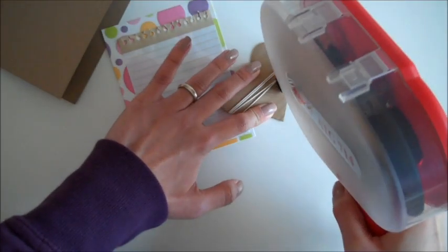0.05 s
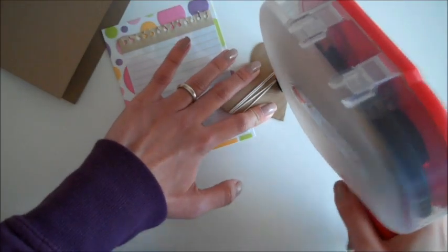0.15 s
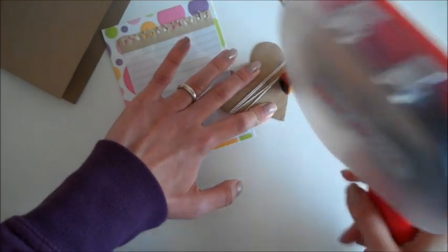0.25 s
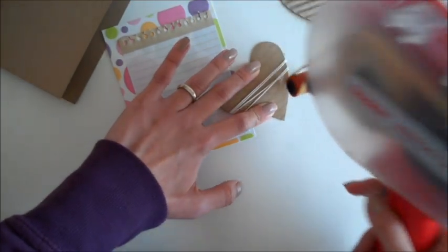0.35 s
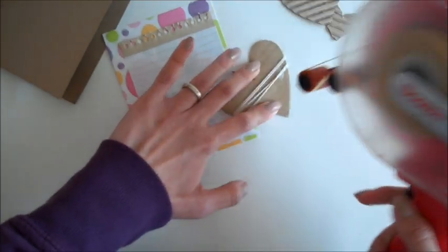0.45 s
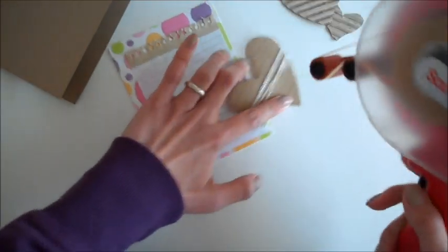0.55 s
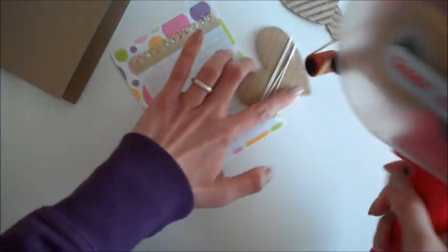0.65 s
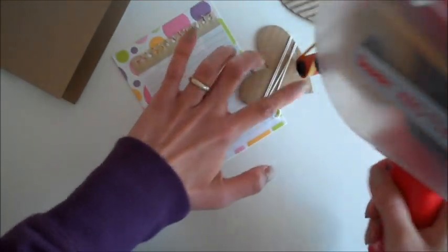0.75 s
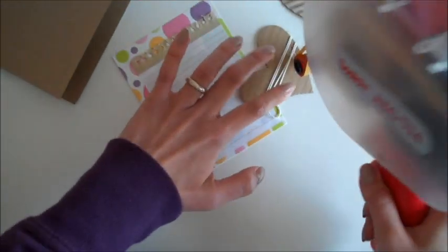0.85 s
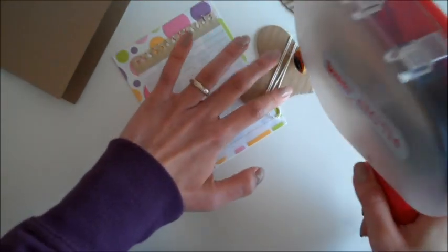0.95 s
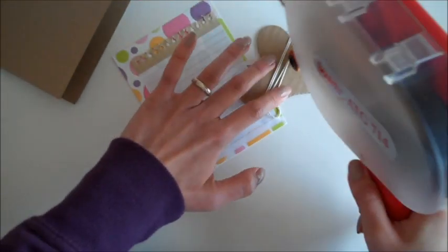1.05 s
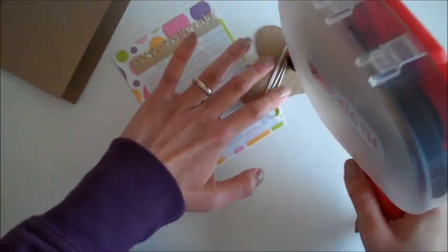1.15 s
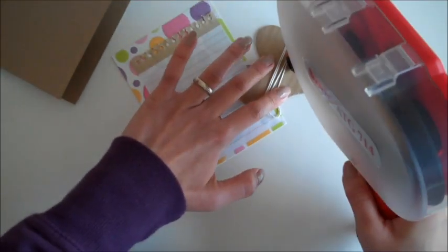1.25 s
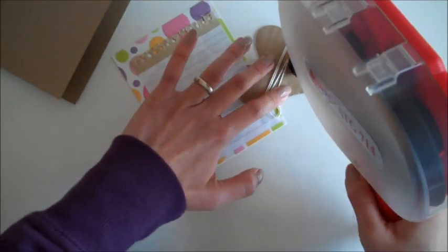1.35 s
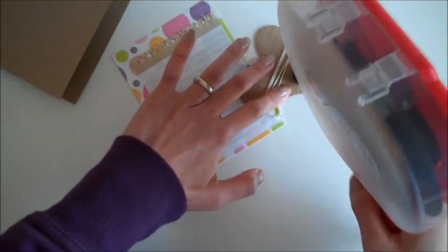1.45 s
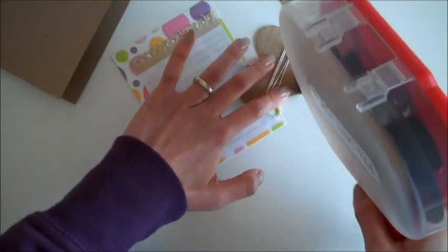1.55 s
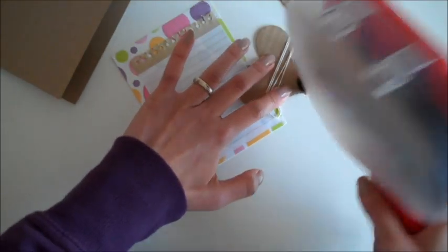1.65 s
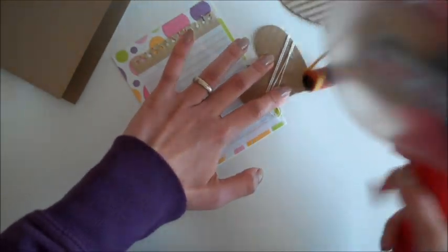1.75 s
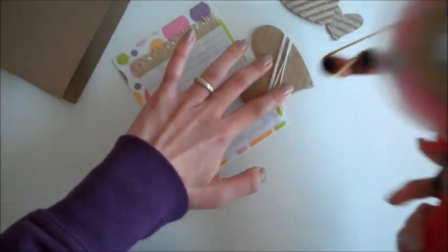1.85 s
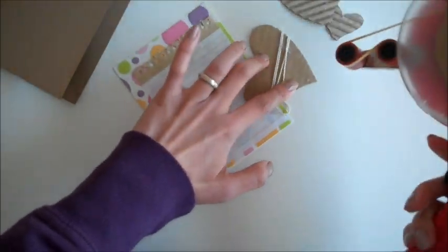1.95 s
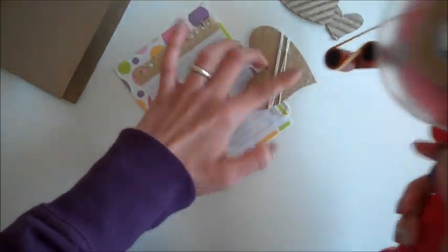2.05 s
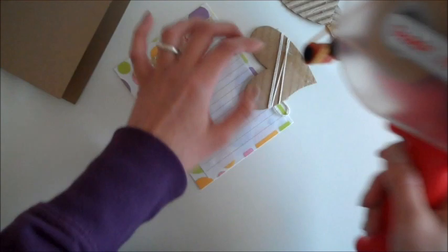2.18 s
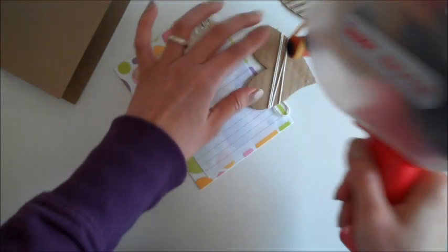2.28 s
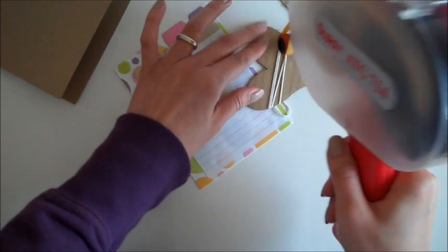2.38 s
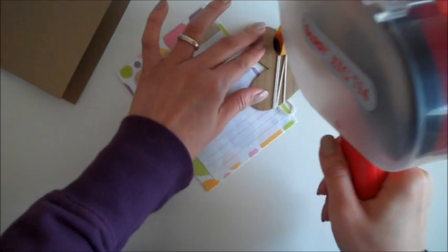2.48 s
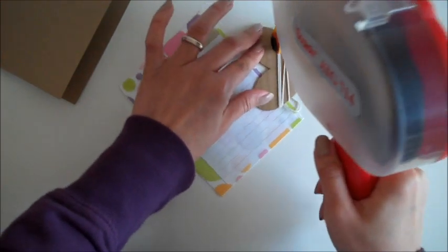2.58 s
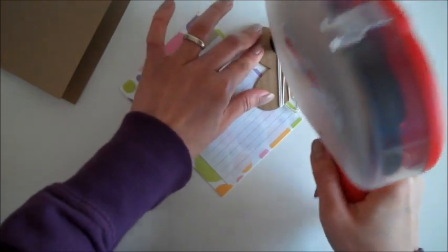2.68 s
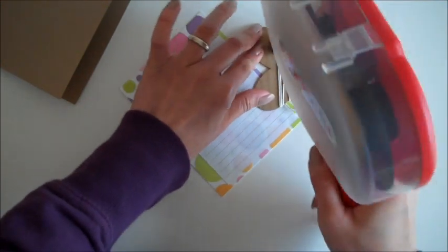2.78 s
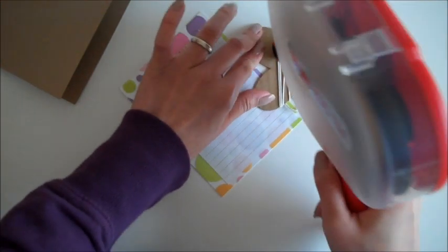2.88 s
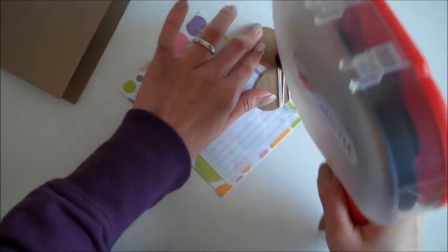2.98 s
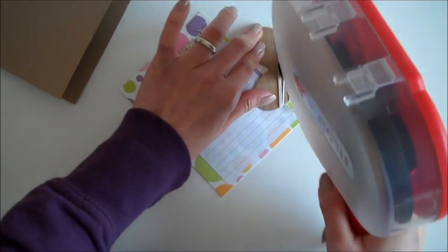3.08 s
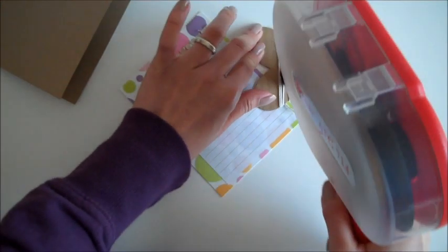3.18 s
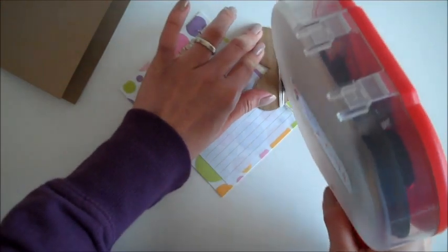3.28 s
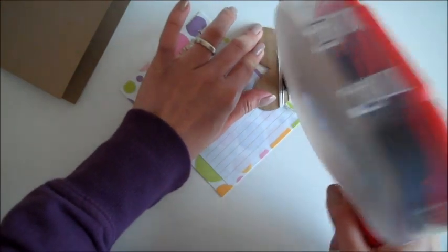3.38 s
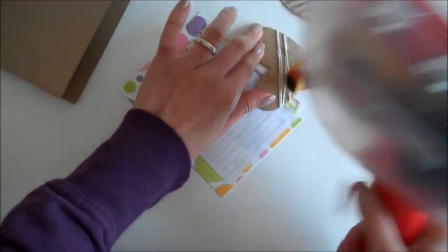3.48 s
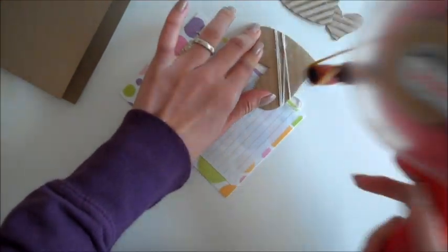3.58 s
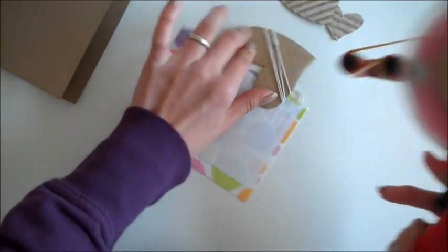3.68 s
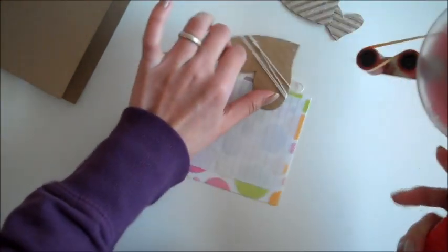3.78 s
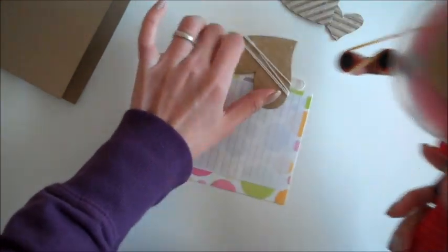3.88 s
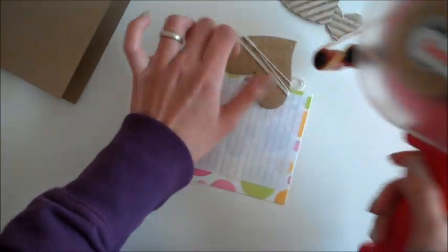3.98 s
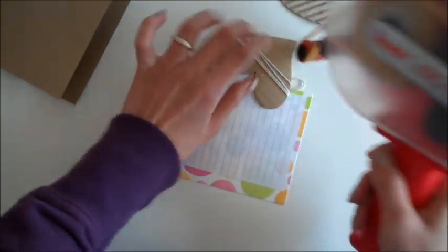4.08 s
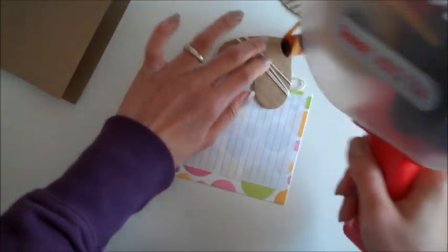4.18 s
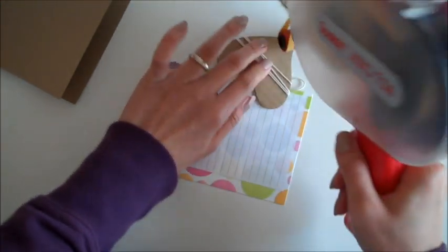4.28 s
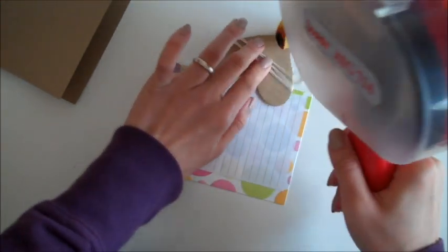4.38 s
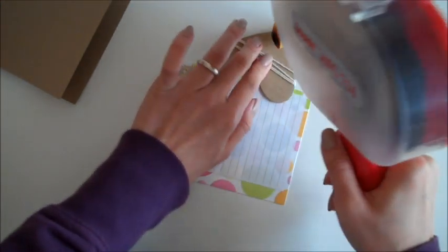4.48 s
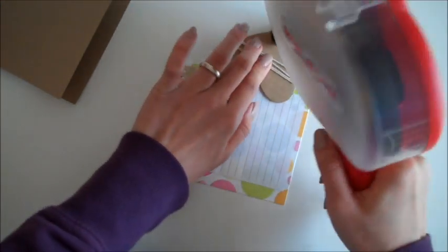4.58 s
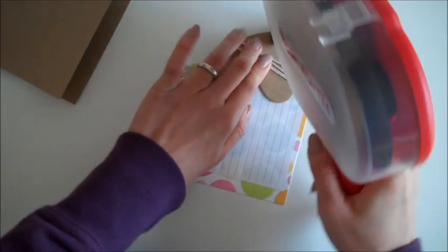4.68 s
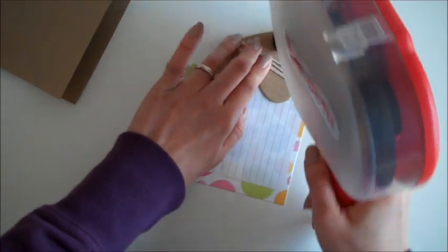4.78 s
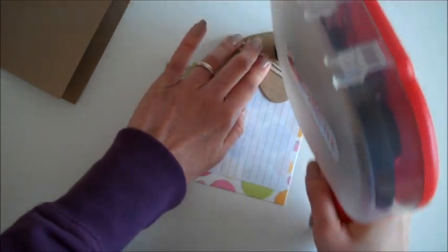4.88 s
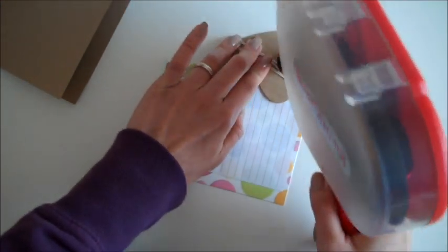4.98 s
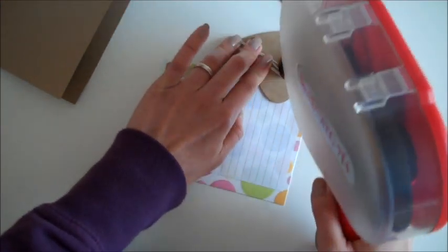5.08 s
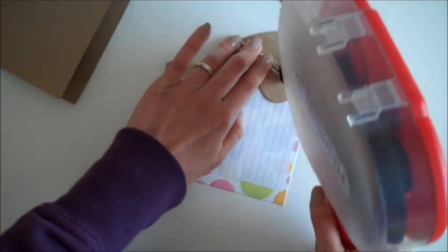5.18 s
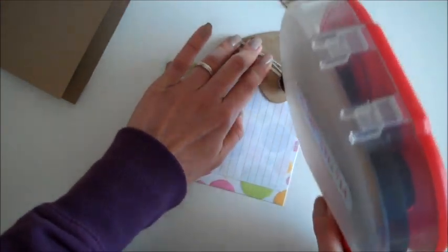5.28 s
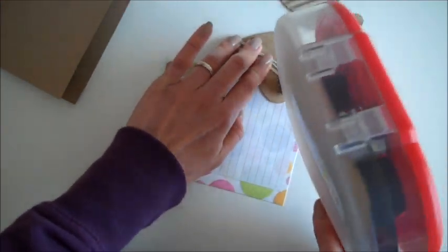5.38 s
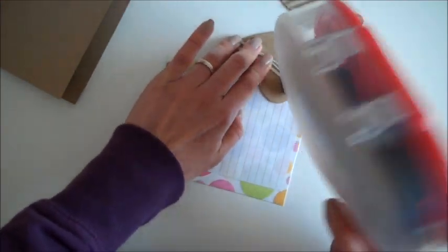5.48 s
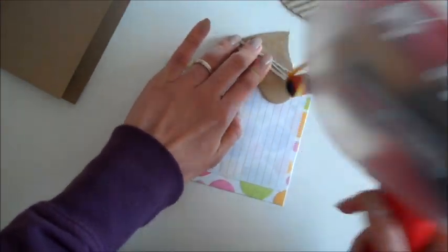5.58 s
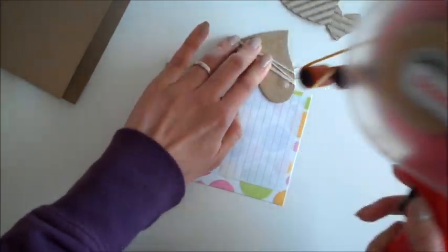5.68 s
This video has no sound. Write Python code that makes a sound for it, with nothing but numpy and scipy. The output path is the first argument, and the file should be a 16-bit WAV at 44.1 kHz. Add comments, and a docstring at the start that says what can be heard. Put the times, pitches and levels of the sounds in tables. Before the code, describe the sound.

Sharp plastic clicks, sticky snaps and short card slides on a tabletop, separated by quiet tape-peeling runs in a small room.

```python
"""Tape gun on a craft table

A big plastic tape gun lays strips of adhesive on a cardboard cut-out, close to the microphones.
Its hollow case knocks (noise bursts, ringing modes); tape crackles off (random pings), glue snaps (short bursts).
Card or hand slides over the table (noise shaped by speed) and bumps boom in its top (struck modes).
A small room answers (decaying noise) over a faint floor, a low hum and a brief whine."""
import sys
import numpy as np
from scipy import signal
from scipy.fft import rfft, irfft, next_fast_len
from scipy.io import wavfile
from scipy.ndimage import map_coordinates

SR = 44100
rng = np.random.default_rng(int(sys.argv[2]) if len(sys.argv) > 2 else 0)


def materialize(psi):
    """Save the field psi as 16-bit PCM at rate SR to the path in sys.argv[1].

    A 1-D psi becomes a single channel; in a 2-D psi each row is a channel.
    """
    bounded = np.clip(np.atleast_2d(psi).T, -1, 1)
    quanta = np.round(bounded * 32767).astype(np.int16)
    wavfile.write(sys.argv[1], SR, quanta)


N = 253134


def amp(db):
    """Decibels to gain."""
    return 10 ** (np.asarray(db) / 20)


def unit(x):
    """Scale to rms 1."""
    return x / np.sqrt(np.mean(x ** 2) + 1e-20)


def along(points, hz):
    """(Hz, value) points read on a log frequency axis."""
    point_hz, value = np.transpose(points)
    return np.interp(np.log(hz + 1), np.log(point_hz), value)


def wobble(knots_per_s):
    """A smooth random curve through normally distributed knots."""
    knots = rng.standard_normal(int(N * knots_per_s / SR) + 4)
    return map_coordinates(knots, [np.arange(N) * knots_per_s / SR])


def filtered(x, response):
    """x times a response of frequency."""
    n = x.shape[-1]
    padded = 2 * next_fast_len(n // 2 + 2048)
    hz = np.fft.rfftfreq(padded, 1 / SR)
    return irfft(rfft(x, padded) * response(hz), padded)[..., :n]


def causal(gain):
    """The minimum-phase response with this gain: nothing sounds before the blow."""
    cepstrum = irfft(np.log(np.maximum(gain, 1e-6)))
    half = len(cepstrum) // 2
    fold = np.r_[1, np.full(half - 1, 2), 1, np.zeros(half - 1)]
    return np.exp(rfft(cepstrum * fold))


def peak(hz, centre_hz, width, boost_db):
    """A gain that lifts one region, its width in log frequency."""
    return amp(boost_db * np.exp(-(np.log((hz + 1) / centre_hz) / width) ** 2))


def ringing(modes, hz):
    """The summed response of damped resonances, alternating in sign."""
    total = 0
    for k, (centre_hz, width_hz, db) in enumerate(modes):
        damping = 1j * hz * width_hz
        total = total + (-1) ** k * amp(db) * damping / (centre_hz ** 2 - hz ** 2 + damping)
    return total


def stereo(pair, alike):
    """Mix two unrelated signals into left and right of the given coherence."""
    def mid_side_gains(hz):
        angle = np.arccos(np.clip(along(alike, hz), -1, 1)) / 2
        return np.array([np.cos(angle), np.sin(angle)])
    mid, side = filtered(pair, mid_side_gains)
    return np.array([mid + side, mid - side])


def rush(spectrum, alike):
    """Coloured stereo noise of rms 1."""
    noise = stereo(rng.standard_normal((2, N)), alike)
    return unit(filtered(noise, lambda hz: amp(along(spectrum, hz))))


def add(track, start_s, sound):
    """Mix a sound in at its start time."""
    part = track[:, round(start_s * SR):][:, :sound.shape[1]]
    part += sound[:, :part.shape[1]]


def voiced(blow, edges_hz, levels_db, span_s):
    """Set each register of a blow to its rms level over the first span_s."""
    out = 0
    for lo, hi, db in zip(edges_hz, edges_hz[1:], levels_db):
        bandpass = signal.butter(3, [lo, hi], 'band', fs=SR, output='sos')
        band = signal.sosfilt(bandpass, blow)
        rms = np.sqrt(np.mean(band[:, :int(span_s * SR)] ** 2))
        out = out + amp(db) * band / rms
    return out


def crackle(rate_per_s, spread_db, pitch_hz, scatter, cycles):
    """Tiny breaks or slips at random: each a decaying ping of its own size and pitch."""
    count, t = int(rate_per_s * N / SR), np.arange(SR // 300) / SR
    when, size, pitch = rng.random((count, 3)).T[:, :, None]
    hz = pitch_hz * np.exp(scatter * (2 * pitch - 1))
    loudness = amp(spread_db * np.minimum(-np.log(1 - size), np.pi))  # few are large
    pings = loudness * np.sin(2 * np.pi * hz * t) * np.exp(-t * hz / cycles)
    places = (when * N).astype(int) + np.arange(len(t))
    return np.bincount(places.ravel(), pings.ravel(), N)[:N]


def strokes(rows, first_law, second_law):
    """Each stroke speeds up and slows to rest; two layers' gains follow powers of its speed."""
    t, first, second = np.arange(N) / SR, 0, 0
    for fastest_s, rise_s, fall_s, first_db, second_db in rows:
        ramp = np.interp(t, [fastest_s - rise_s, fastest_s, fastest_s + fall_s], [0, 1, 0])
        speed = np.sin(np.pi / 2 * ramp)
        first = first + amp(first_db) * speed ** first_law
        second = second + amp(second_db) * speed ** second_law
    return first, second


# Floor spectrum. Each row: Hz, relative dB per Hz.
FLOOR = [(20, -5), (60, -10), (100, -7), (160, -10.5), (240, -10), (400, -11.5), (800, -9), (1500, -14),
         (3000, -16), (7000, -17), (10000, -23.5), (14000, -22), (14400, -63.5)]
# Left-right likeness of floor and room tail. Each row: Hz, coherence.
DIFFUSE = [(40, 0), (130, 0.73), (300, 1), (650, 0.38), (1400, 0.16), (3100, 0), (14000, 0)]


def floor(level_db=-65.5):
    """Steady diffuse noise of the quiet background."""
    return amp(level_db) * rush(FLOOR, DIFFUSE)


def tone(rows, waver=0.023, flutter_db=-0.5):
    """A slightly unsteady sine that sounds only within its span."""
    t = np.arange(N) / SR
    row_s, row_hz, row_db = np.transpose(rows)
    hz, db = np.interp(t, row_s, row_hz), np.interp(t, row_s, row_db)
    phase = 2 * np.pi * np.cumsum(hz * (1 + waver * wobble(16))) / SR
    level = np.sqrt(2) * amp(db + flutter_db * wobble(7.1))
    return level * np.sin(phase) * (t >= row_s[0]) * (t <= row_s[-1])


# Low hum track. Each row: time in seconds, mean Hz, mean level in dB rms.
HUM = [(0, 91.5, -87), (0.9, 98, -80.5), (1.5, 111.5, -78.5), (2.2, 119, -76.5), (2.8, 125.5, -75.5),
       (3.1, 129.2, -82), (3.6, 128, -90)]


def hum():
    """A faint low tone drifts upwards."""
    return tone(HUM)


# Whine track. Each row: time in seconds, mean Hz, mean level in dB rms.
WHINE = [(1.88, 470, -90), (1.97, 470, -62.5), (2.18, 460, -74), (2.26, 464, -64.5), (2.38, 495, -77.5),
         (2.5, 506, -73), (2.56, 505, -105)]


def whine():
    """A faint tone while the tool is held aloft."""
    return tone(WHINE)


# Tail decay. Each row: Hz, t60 in seconds.
ROOM_DECAY = [(150, 0.44), (500, 0.29), (2000, 0.44), (6500, 0.37), (13000, 0.32)]
# Tail colour. Each row: Hz, gain in dB.
ROOM_LEVEL = [(150, -2.5), (500, -2), (1500, -8.5), (4000, -12), (7500, -14.5), (13000, -7.5)]


def room(x, build_s=0.0039):
    """A small room: reflections thicken within some ms, then die at a speed set by frequency."""
    hz, t, cells = signal.stft(rng.standard_normal((2, SR * 3 // 4)), SR, nperseg=256)
    decay = amp(-60 * t / along(ROOM_DECAY, hz)[:, None])
    tail = signal.istft(cells * decay, SR, nperseg=256)[1]
    age_s = np.arange(tail.shape[1]) / SR
    tail = stereo(tail, DIFFUSE) * (1 - np.exp(-(age_s / build_s) ** 2))
    tail = tail / np.linalg.norm(tail[0])
    tail = filtered(tail, lambda hz: causal(amp(along(ROOM_LEVEL, hz))))
    return signal.fftconvolve(x.mean(axis=0)[None], tail, axes=1)[:, :N]


# Left-right likeness of near sounds. Each row: Hz, coherence.
NEAR = [(200, 0.81), (700, 1), (1400, 0.94), (3100, .8), (6800, 0.5), (14000, 0.18)]
# Table top resonances. Each row: Hz, width in Hz, relative dB.
TABLE = [(94.9, 30, -3.5), (157.7, 30, 2.5), (229.6, 17, 4), (340, 27, -11.5), (486, 17, -8), (627, 63, -5),
         (724, 42, -1.5)]
# Bump spectrum. Each row: Hz, relative dB.
TABLE_COLOUR = [(25, -6.5), (70, -7.5), (170, -11), (400, 2), (750, -1.5), (1050, -5), (1900, -9.5),
                (2500, -28.5), (7000, -28.5), (10000, -52.5), (15000, -70.5)]
# Tool, hand or card bumps. Each row: start in seconds, shudder, boom and knock levels in dB.
THUMPS = [(0.325, -63, -65, -75), (0.636, -79, -56, -50.5), (0.788, -76, -64, -53),
          (1.204, -64.5, -67, -77), (1.311, -66, -63.5, -78), (1.861, -68, -44.5, -51),
          (2.498, -87.5, -64, -62), (2.8711, -82, -63, -52), (3.769, -76.5, -65, -47.5),
          (3.945, -85, -57.5, -61), (4.686, -79, -80, -74), (4.79, -82, -67, -43.5),
          (5.4194, -51, -39.5, -34), (5.631, -81, -46, -54)]


def thumps(modes_db=9, rattle_db=-27, rattle_t60_s=0.1):
    """One soft push bends the table top, which booms and rattles briefly."""
    out, t = np.zeros((2, N)), np.arange(SR // 4) / SR

    def colour(hz):
        modes = amp(modes_db) * abs(ringing(TABLE, hz))
        return causal(amp(along(TABLE_COLOUR, hz)) * np.hypot(1, modes))
    for start_s, *levels_db in THUMPS:
        rattle = amp(rattle_db - 60 * t / rattle_t60_s) * stereo(rng.standard_normal((2, len(t))), NEAR)
        blow = filtered((t == 0) + rattle, colour)
        add(out, start_s, voiced(blow, [22, 120, 280, 12000], levels_db, span_s=0.0072))
    return out


# Paper hiss spectrum. Each row: Hz, relative dB per Hz.
HISS = [(1200, -34.5), (2400, -17), (3300, -5.5), (4400, 1), (6000, 1.5), (7500, 4), (9300, -10.5),
        (11500, -18.5), (14000, -18), (14500, -57.5)]
# Dull rub spectrum, also of the tape reels. Each row: Hz, relative dB per Hz.
RUB = [(60, -17.5), (150, -23.5), (230, 2), (400, -8.5), (750, -4.5), (1400, -2.5), (2400, -5.5),
       (4000, -16), (8000, -40), (14500, -67)]
# Slides. Each row: fastest at in seconds, speeding up and slowing down in seconds,
# hiss and rub peak gains in dB before the layer trims.
SLIDES = [(0.02, 0.087, 0.082, -65, -65.5), (0.27, 0.35, 0.18, -60.5, -63), (0.41, 0.19, 0.24, -44.5, -52),
          (0.61, 0.16, 0.27, -39, -55.5), (0.726, 0.021, 0.028, -33.5, -42.5),
          (1.2, 0.025, 0.09, -52, -60.5), (2.095, 0.21, 0.073, -49.5, -58.5),
          (2.27, 0.37, 0.22, -77.5, -67), (2.485, 0.046, 0.037, -61, -64), (2.59, .15, 0.2, -51.5, -64.5),
          (3.59, 0.27, 0.18, -51.5, -56), (3.785, 0.17, 0.22, -33.5, -56),
          (3.914, 0.024, 0.078, -41.5, -57), (4.315, 0.091, 0.063, -61.5, -70.5),
          (4.468, .18, 0.12, -46, -71.5), (4.565, 0.1, 0.17, -61.5, -67.5),
          (5.595, 0.092, 0.1, -47.5, -53.5)]


def slides(hiss_law=5.35, rub_law=3.06, hiss_trim_db=-1, rub_trim_db=-3, catch_db=2.12):
    """Paper fibres hiss over the table, catching slightly; the card adds a dull rub."""
    hiss, rub = strokes(SLIDES, hiss_law, rub_law)
    catch = amp(catch_db * wobble(220))
    fibres = amp(hiss_trim_db) * hiss * rush(HISS, NEAR)
    card = amp(rub_trim_db) * rub * rush(RUB, NEAR)
    return catch * (fibres + card)


# Snap spectrum. Each row: Hz, relative dB per Hz.
SNAP_COLOUR = [(150, -10), (600, -10.5), (1500, -5), (2800, -8.5), (4400, 8), (6800, 5), (8000, 3),
               (10000, -7), (13800, -16.5), (16000, -30.5)]
# Adhesive lets go or a card edge flicks. Each row: start in seconds, body and crack levels in dB,
# crack centre in Hz.
SNAPS = [(0.0679, -53, -57, 4770), (0.3163, -40, -28.5, 5600), (0.3843, -49, -29.5, 6800),
         (0.4359, -29.5, -27.5, 5830), (0.6346, -25, -16.5, 7000), (1.133, -78.5, -44.5, 7450),
         (1.5005, -57, -40, 7200), (1.5868, -70, -42.5, 7150), (1.6072, -69, -42.5, 7100),
         (1.768, -59, -36, 6550), (1.775, -56, -32.5, 6650), (1.783, -58, -34, 6240),
         (1.8573, -32, -23.5, 6870), (2.4653, -72, -39.5, 6960), (2.4778, -51, -46, 4670),
         (2.4963, -66, -32, 7130), (3.0989, -72, -41, 7700), (3.1473, -67, -42, 7400),
         (3.2168, -54, -48.5, 7330), (3.48, -41, -27.5, 7640), (3.486, -35, -25.5, 6560),
         (3.527, -54, -28.5, 4560), (3.5575, -32, -27, 4180), (3.6057, -64, -30.5, 5630),
         (3.6206, -54, -37.5, 7590), (4.7843, -57, -49, 8080), (5.1996, -77, -48, 8700),
         (5.2423, -69, -45.5, 7400), (5.318, -62, -37.5, 6500), (5.6094, -69, -29.5, 6070),
         (5.6661, -37, -17.5, 7200)]


def snaps(hold_s=0.00018, snap_t60_s=0.0066, ring_db=-22, ring_t60_s=0.054):
    """A strand of glue parts or a card edge flicks: a very short burst, then a faint brief ring."""
    out, t = np.zeros((2, N)), np.arange(SR // 16) / SR
    burst = amp(-60 * np.maximum(t - hold_s, 0) / snap_t60_s)
    shape = burst + amp(ring_db - 60 * t / ring_t60_s)
    for start_s, *levels_db, crack_hz in SNAPS:
        def colour(hz):
            lift = peak(hz, crack_hz, width=.2, boost_db=8.5)
            return causal(amp(along(SNAP_COLOUR, hz)) * lift)
        blow = filtered(stereo(rng.standard_normal((2, len(t))), NEAR) * shape, colour)
        add(out, start_s, voiced(blow, [180, 3000, 17000], levels_db, span_s=0.0015))
    return out


# Plastic case resonances. Each row: Hz, width in Hz, relative dB.
CASE = [(234.5, 8.4, -5), (521, 22, 3), (735.5, 150, 0.5), (810.5, 43, 2), (1043.5, 31, -3), (1160, 37, 1),
        (1330, 170, -1.5), (1644, 31.3, 2), (1807, 42, 0), (2294, 41, 1)]


def case(hz):
    """The ringing of the hollow plastic case, as a response."""
    return ringing(CASE, hz)


# Peel spectrum. Each row: Hz, relative dB per Hz.
PEEL = [(1500, -16.5), (3000, -5.5), (5000, -5), (6400, -2.5), (7600, 2), (9500, -11), (14000, -13),
        (15000, -69.5)]
# Roller runs over the card. Each row: fastest at in seconds, speeding up and slowing down in seconds,
# peel and rolling peak gains in dB before the layer trims.
RUNS = [(1.54, .17, 0.21, -56, -60.5), (3.05, 0.3, 0.51, -56.5, -65), (4.94, 0.49, 0.36, -56.5, -61.5),
        (5.3, 0.079, 0.16, -55, -62.5)]


def tape(peel_law=2.33, roll_law=1, peel_trim_db=-1, fizz_trim_db=-6, tick_trim_db=-6,
         roll_trim_db=-3, creak_trim_db=-7, judder_db=5.0, tug_db=2):
    """Glue threads break in an uneven crackle while the turning reels grumble and creak in the case."""
    peel, rolling = strokes(RUNS, peel_law, roll_law)

    def peel_colour(hz):
        return causal(amp(along(PEEL, hz)))
    threads = np.array([crackle(880, spread_db=5.5, pitch_hz=7200, scatter=0.42, cycles=1.7)
                        for _ in range(2)])
    grain = unit(filtered(stereo(threads, NEAR), peel_colour))
    # thicker strands part with sharp ticks
    strands = crackle(96, spread_db=8.5, pitch_hz=8320, scatter=0.4, cycles=0.7)
    ticks = unit(filtered(strands, peel_colour))
    glue = amp(peel_trim_db + tug_db * wobble(45)) * grain
    glue = glue + amp(fizz_trim_db) * rush(PEEL, NEAR) + amp(tick_trim_db) * ticks
    reels = unit(rush(RUB, NEAR) * amp(judder_db * wobble(60)))
    # the axles slip in tiny jerks that ring the case
    slips = crackle(330, spread_db=6, pitch_hz=1360, scatter=.9, cycles=3.7)
    creak = unit(filtered(slips, lambda hz: causal(np.hypot(1, 3 * abs(case(hz))))))
    return peel * glue + rolling * (amp(roll_trim_db) * reels + amp(creak_trim_db) * creak)


# Knock spectrum. Each row: Hz, relative dB per Hz.
KNOCK_COLOUR = [(40, -13.5), (130, -22.5), (250, -3), (520, -2.5), (1250, 0.5), (2300, -1), (3300, -2.5),
                (4400, -2.5), (6800, -1.5), (8000, -3.5), (9500, -18), (13800, -27.5), (15200, -48)]
# Case and reels knock. Each row: seating time in seconds, thud, body and crack levels in dB,
# ring and crack centres in Hz.
KNOCKS = [(0.1695, -58, -36.5, -38.5, 1330, 5240), (0.2272, -73, -35, -48, 1075, 5900),
          (0.3247, -46.5, -21.5, -18, 521, 6400), (0.35, -48, -40, -61, 1770, 3150),
          (1.201, -66, -48.5, -50, 1280, 4610), (1.2502, -68, -51.5, -59, 1280, 3520),
          (1.3107, -67, -42, -51.5, 2060, 3700), (1.34, -60, -44, -40.5, 1040, 5470),
          (1.7116, -52, -36.5, -36.5, 1300, 5630), (1.7615, -62, -40.5, -56, 1240, 6540),
          (1.7963, -62, -24.5, -21.5, 693, 6300), (1.8612, -44, -25.5, -12.5, 850, 5480),
          (2.326, -64.5, -63.5, -73.5, 1296, 2970), (2.7764, -71, -47.5, -49.5, 1220, 3190),
          (2.8867, -67, -51, -55, 2300, 3400), (3.1772, -70, -59.5, -56, 1320, 4570),
          (3.4514, -57, -38.5, -48.5, 1350, 4260), (3.5132, -62, -38.5, -51, 1090, 6010),
          (3.592, -65, -48.5, -42.5, 2300, 3680), (3.765, -54, -45, -44, 770, 4860),
          (4.6351, -67.5, -48.5, -50, 2470, 3920), (4.672, -61, -47, -59, 2320, 3520),
          (4.6837, -59, -43, -55, 2300, 3970), (4.7034, -73, -53, -60, 724, 3380),
          (4.7996, -63, -46, -41, 1070, 4760), (4.8113, -63, -45, -46.5, 2350, 3000),
          (5.365, -65, -62, -54, 1320, 7300), (5.516, -64, -36.5, -42.5, 1240, 5930),
          (5.6254, -53.5, -37.5, -26.5, 2480, 5540)]


def knocks(lead_s=.005, seat_s=0.0019, chatter_t60_s=0.027, ring_t60_s=0.45, lead_db=-12, ring_db=-23,
           case_db=29, spot_db=7.5, hollow_db=-6.5):
    """Loose plastic parts chatter for a few ms and ring the case; each spot struck favours its own pitches."""
    out, t = np.zeros((2, N)), np.arange(SR // 6) / SR
    age = np.maximum(t - lead_s, 0)
    scrape = amp(lead_db) * (t / lead_s) ** 2  # parts scrape briefly before they seat
    chatter = amp(-60 * np.maximum(age - seat_s, 0) / chatter_t60_s)
    shape = np.where(t < lead_s, scrape, chatter + amp(ring_db - 60 * age / ring_t60_s))
    impulse = 1.0 * (np.arange(len(t)) == round(lead_s * SR))
    ring = amp(case_db) * filtered(impulse, case)
    for seated_s, thud_db, body_db, crack_db, ring_hz, crack_hz in KNOCKS:
        levels_db = [thud_db, body_db + hollow_db, body_db, crack_db]

        def colour(hz):
            spot = peak(hz, ring_hz, width=0.1, boost_db=spot_db) * peak(hz, crack_hz, width=0.22, boost_db=6)
            return causal(amp(along(KNOCK_COLOUR, hz)) * spot)
        rattle = stereo(rng.standard_normal((2, len(t))), NEAR) * shape
        blow = filtered(rattle + ring, colour)
        add(out, seated_s - lead_s, voiced(blow, [70, 400, 1000, 3000, 17000], levels_db, span_s=0.014))
    return out


def scene():
    """The craft work, its echo and the quiet background."""
    background = floor() + hum() + whine()
    handling = slides() + thumps() + snaps() + tape()
    # the case rattles differently towards the microphones and towards the walls
    to_microphones, to_walls = knocks(), knocks()
    return background + handling + to_microphones + room(handling + to_walls)


# Treble difference of the two microphone ports. Each row: Hz, left minus right in dB.
PORTS = [(200, 0.5), (2400, 0), (4400, -1), (5600, -6.5), (6600, 2.5), (8100, 15), (10000, 5), (14000, 6)]


def record(dry, lag_s=.000012, ceiling=0.43, top_hz=16400):
    """Ports differ in treble and the left hears first; loud peaks overload softly, the top rolls off."""
    def ports(hz):
        gains = amp(np.outer([.5, -.5], along(PORTS, hz)))
        gains = gains / np.sqrt(np.mean(gains ** 2, axis=0))
        return gains * np.exp(1j * np.pi * lag_s * np.outer([1, -1], hz))
    x = filtered(dry, ports)
    x = x / (1 + (x / ceiling) ** 4) ** (1 / 4)
    return filtered(x, lambda hz: np.clip((top_hz - hz) / 1500, 0, 1) ** 2)


dry = scene()
out = record(dry)
materialize(out)
```